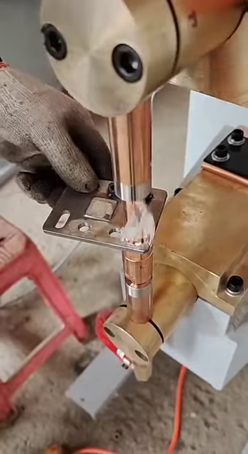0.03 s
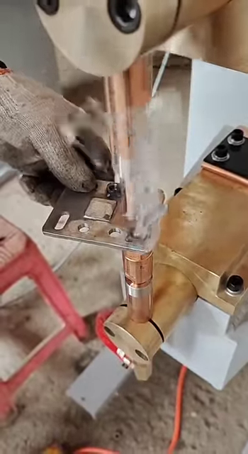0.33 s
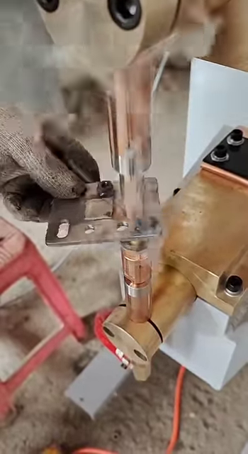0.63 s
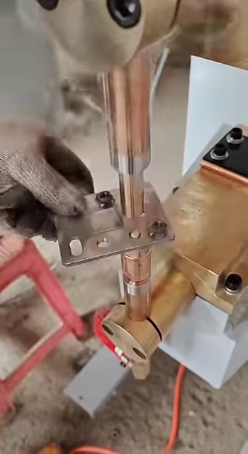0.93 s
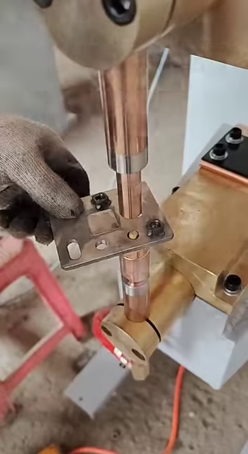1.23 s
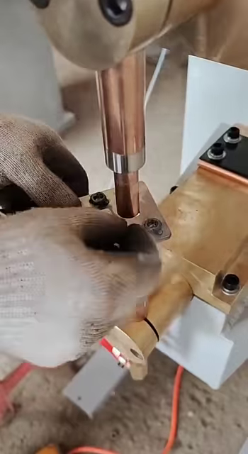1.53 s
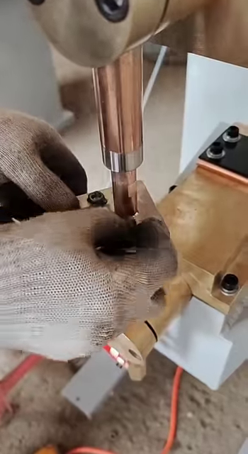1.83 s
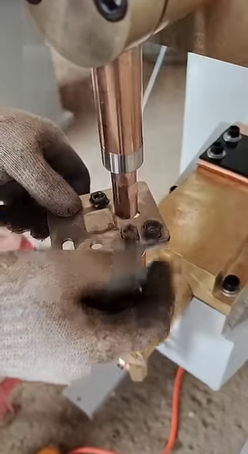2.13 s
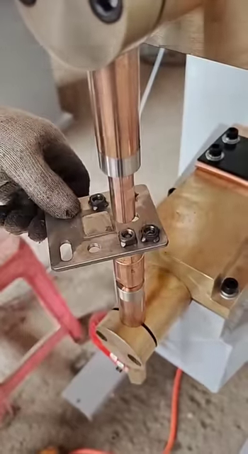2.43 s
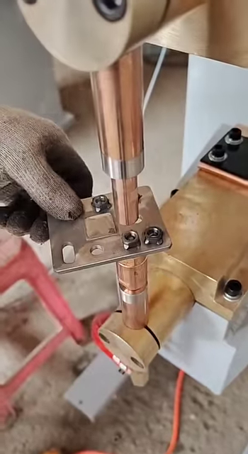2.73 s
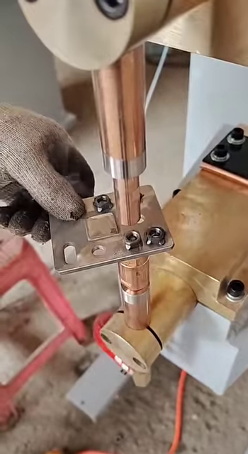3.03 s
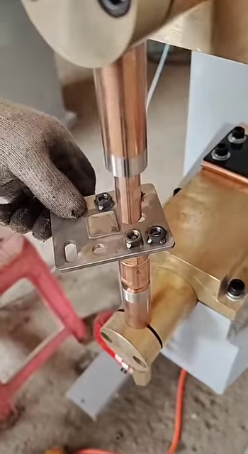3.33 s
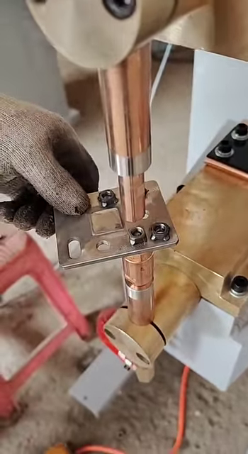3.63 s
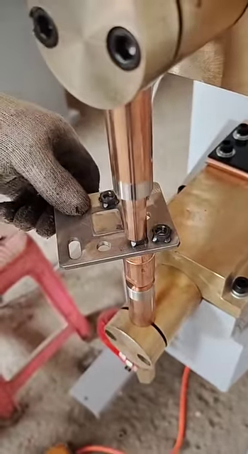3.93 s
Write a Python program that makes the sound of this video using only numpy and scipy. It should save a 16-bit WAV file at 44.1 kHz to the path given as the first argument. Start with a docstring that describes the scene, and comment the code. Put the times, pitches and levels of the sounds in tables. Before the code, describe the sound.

Close by in a workshop, a spot welder blasts air and thuds down twice. Between the two strokes come light metal ticks, soft glove rustling and a sharp pedal click, over a faint low drone.

```python
"""A workshop, close to a pneumatic resistance welder that fixes nuts to a steel plate.
Twice its valve dumps air in a bright hiss and the ram thuds down, booming through the frame.
In between, the plate ticks against the electrodes, a gloved hand sets the next nut with a rustle
of cloth, and the pedal clicks. Hiss, ticks and clicks echo over a low drone."""
import sys
import numpy as np
from scipy import signal
from scipy.fft import rfft, irfft
from scipy.io import wavfile
from scipy.ndimage import uniform_filter1d

SR = 44100
rng = np.random.default_rng(int(sys.argv[2]) if len(sys.argv) > 2 else 0)


def unload_audio(sound):
    """Save the sound as a 16-bit wav file, at the path given as the first command line argument."""
    columns = np.transpose(np.atleast_2d(sound))
    # keep every value between -1 and 1, then stretch to whole-number steps
    steps = np.round(np.clip(columns, -1, 1) * 32767)
    wavfile.write(sys.argv[1], SR, steps.astype(np.int16))


N = 176400
T = np.arange(2 * SR) / SR  # clock for one event, in seconds


# Colour of the rushing air (frequency [Hz], level [dB])
HISS_COLOUR = [(60, -40.5), (100, -15.5), (170, -17.5), (300, -28), (600, -25.5), (1000, -14.5),
               (1400, -12.5), (1800, -10.5), (2300, -3.5), (2800, -1.5), (3600, -4.5), (5000, -4.5),
               (6100, 0), (7200, -6.5), (8200, -15.5), (9400, -8), (10600, -17), (11700, -12)]
# Narrow muffler resonances (frequency [Hz], boost [dB])
MUFFLER_PEAKS = [(1987, 3.5), (2450, 7), (2663, 6), (2772, 0), (2875, 6), (3107, 7), (3331, 4.5), (3930, 3),
                 (4096, 9.5), (6115, 3)]

def muffler_hiss(half_width_hz=15):
    """Turbulent air, coloured by the muffler's resonances."""
    hz = np.fft.rfftfreq(len(T), 1 / SR)
    boost_db = sum(db / (1 + ((hz - f) / half_width_hz) ** 2) for f, db in MUFFLER_PEAKS)
    return unit(irfft(rfft(noise(HISS_COLOUR, len(T))) * amp(boost_db)))


# Exhaust blasts (time [s], hold [s], level [dB])
BLASTS = [(-.1, 0.081, -21.5), (3.381, 0.15, -17.5)]
# Tail of a blast (frequency [Hz], T60 [s])
BLAST_DECAY = [(300, 1.2), (1200, 1.71), (2800, 1.233), (5500, 0.99), (7500, 0.65), (11000, 0.63)]
# Spits of air as the valve opens (time [s], level [dB], attack [s], T60 [s])
PUFFS = [(3.298, -50, .003, 0.59), (3.331, -43.5, 0.023, .1), (3.353, -25.5, 0.0047, 0.22)]
# Their sharp colour (frequency [Hz], level [dB])
PUFF_COLOUR = [(180, -56), (300, -27.5), (2200, -4.5), (2770, 1), (3550, -9), (4140, 2), (5130, -12),
               (5990, -4.5), (12000, -15.5), (15600, -47), (22000, -120)]
# Ring of the valve body (frequency [Hz], relative level [dB], T60 [s])
VALVE_MODES = [(134, -9, 0.13), (205.5, 2.5, 0.082), (325, -10.5, 0.12), (1985, 3, .15)]

def air_valve(attack_s=.0075, sag_db_per_s=12, kick_s=3.379, kick_db=-27):
    """The valve puffs and kicks open; the exhaust holds, then dulls as the cylinder empties."""
    out = np.zeros(N)
    for s, hold, db in BLASTS:
        pressure = np.minimum(T / attack_s, 1) * amp(db - sag_db_per_s * np.minimum(T, hold))
        add(out, s, pressure * fade(muffler_hiss(), BLAST_DECAY, hold))
    for s, db, attack, t60 in PUFFS:
        add(out, s, amp(db) * burst(PUFF_COLOUR, attack, t60))
    add(out, kick_s, sum(amp(kick_db + db) * mode(hz, .0035, t60) for hz, db, t60 in VALVE_MODES))
    return out


# Ram hits (time [s], boom level [dB], hardness: gain on the upper modes [dB], rattle level [dB])
RAM_HITS = [(.041, -11.5, -19.5, -22.5), (3.538, -18.5, 2, -19)]
# Boom of the frame (frequency [Hz], relative level [dB], T60 [s])
FRAME_MODES = [(82.3, -20, 1.2), (97.8, -13.5, 0.81), (112.5, -18, 2.25), (137.4, -1, .55),
               (158.3, -14, 0.54), (183, -11.5, 1.1), (222, -3, 0.44), (237, -15.5, 2.8), (269, -22.5, 0.6),
               (326, -3.5, .35), (335, -18, 1.3), (392, -15, .7), (455.5, -19.5, .5), (555, -13, 0.34),
               (697, -16, 0.47), (964, -5, .28), (1015, -19, 1.0), (1188, -22.5, 0.35)]
# Colour of the dense panel rattle (frequency [Hz], level [dB])
RATTLE_COLOUR = [(25, -32.5), (50, -24.5), (90, -5), (160, 0), (260, -2.5), (450, -13), (900, -13.5),
                 (1500, -17.5), (4000, -21.5)]
# Its tail (frequency [Hz], T60 [s])
RATTLE_DECAY = [(50, 1.5), (120, 1.52), (250, 1.74), (500, 0.78), (900, 0.37), (3000, 0.21)]

def ram(boom_attack_cycles=2.9, hardness_ramp_hz=(140, 410), rattle_attack_s=.008):
    """The electrode lands: the frame booms and its panels rattle."""
    out = np.zeros(N)
    for s, boom_db, hardness_db, rattle_db in RAM_HITS:
        for hz, db, t60 in FRAME_MODES:
            gain = amp(boom_db + db + hardness_db * np.interp(hz, hardness_ramp_hz, [0, 1]))
            add(out, s, gain * mode(hz, boom_attack_cycles / hz, t60, len(T)))
        rattle = fade(noise(RATTLE_COLOUR, len(T)), RATTLE_DECAY)
        add(out, s, amp(rattle_db) * np.minimum(T / rattle_attack_s, 1) * rattle)
    return out


# Plate and nut ticks (time [s], crack level [dB], crack tilt [dB/octave], attack [s],
# ring level of each of the mode groups 0-3 [dB])
TICKS = [(0.332, -32, -5, .001, -43, -23, -39, -42), (0.4991, -37.5, 1, 0.0009, -64, -33, -40, -57),
         (.527, -42.5, 1, 0.0041, -60, -39, -38.5, -58), (0.6306, -39, -2, 0.0018, -41.5, -30, -38, -48),
         (0.684, -31, -3, 0.0038, -23, -36, -27, -42), (1.0772, -41, 5.5, 0.00075, -68, -54, -52, -58),
         (1.423, -57.5, 0, .002, -52.5, -60, -71, -66), (1.6585, -44, 3, .002, -54, -45, -46, -40),
         (1.776, -52, 1.5, .003, -56, -57, -48, -53), (1.83, -59, -1, 0.0017, -63, -56, -54.5, -70),
         (3.14, -58, -7, .003, -76, -70, -68, -76), (3.224, -45.5, 5, 0.0041, -52, -58, -49, -62)]
# Ring of the plate (frequency [Hz], relative level [dB], T60 [s], group [rounded to 0-3])
PLATE_MODES = [(2890, -0.5, .07, -0.5), (3774, -15.5, 0.047, 0), (4910, -4, 0.044, 1),
               (5315, -4, 0.059, 0.5), (6400, -6.5, 0.045, 2), (7570, -1, .075, 2), (10190, -4, .08, 3)]
# Bright transient of a tick (frequency [Hz], level [dB])
CRACK_COLOUR = [(500, -11), (1200, -3.5), (3000, 2.5), (5200, 3.5), (7500, 4), (8500, -10.5), (10000, -2),
                (12000, -10)]
# The work knocks on the lower electrode (time [s], level [dB], T60 [s])
KNOCKS = [(.338, -45, 0.19), (.53, -45, 0.45), (.57, -52, 0.39), (.688, -42.5, 0.28), (1.668, -63, .25),
          (1.782, -58, 0.46), (2.757, -73, .25), (3.112, -52.5, 0.068), (3.226, -52, 0.16)]
# Dull body of a knock (frequency [Hz], level [dB])
KNOCK_COLOUR = [(300, -27), (700, -7), (870, -4.5), (1020, 3), (1200, -6), (1600, -17), (4000, -31.5)]

def plate(seated_s=1.3, seated_tuning=1.012):
    """Steel contacts crack, ring and knock; seated on the guide pin, the plate rings a touch higher."""
    out = np.zeros(N)
    for s, crack_db, tilt_db, attack, *ring_db in TICKS:
        tuning = seated_tuning if s > seated_s else 1
        ring = sum(amp(db + ring_db[round(group)]) * mode(hz * tuning, attack, t60)
                   for hz, db, t60, group in PLATE_MODES)
        add(out, s, chatter(ring))
        add(out, s, amp(crack_db) * burst(CRACK_COLOUR, attack, t60=.07, tilt_db=tilt_db))
    for s, db, t60 in KNOCKS:
        add(out, s, amp(db) * burst(KNOCK_COLOUR, attack=.004, t60=t60))
    return out


def chatter(ring, depth=.33):
    """A loose contact rattles while it rings, roughening the tone."""
    shake = unit(uniform_filter1d(rng.standard_normal(len(ring)), size=90))
    return ring * (1 + depth * shake) / np.hypot(1, depth)


# Pedal click and bounce (time [s], ring level [dB], snap level [dB], tuning [ratio])
CLICKS = [(3.277, -21, -29, 1.0), (3.2871, -25.5, -30.5, 1.04)]
# Ring of the switch (frequency [Hz], relative level [dB], T60 [s])
SWITCH_MODES = [(1208, -3, 0.032), (1350, -6.5, 0.037), (1730, -6.5, 0.057), (3210, -17, 0.097),
                (4670, -13, 0.038), (5100, -7, 0.041), (5450, -11.5, 0.048), (9820, -15.5, 0.03)]
# Colour of its scrape and snap (frequency [Hz], level [dB])
SNAP_COLOUR = [(150, -10), (350, -2), (700, -13), (1200, 4), (2500, 1), (5800, -2), (8000, -13),
               (12000, -9)]

def pedal(scrape_s=.023, scrape_db=-45):
    """The lever scrapes through its slack, then the switch snaps over and bounces."""
    out = np.zeros(N)
    add(out, CLICKS[0][0] - scrape_s, amp(scrape_db) * burst(SNAP_COLOUR, attack=scrape_s, t60=.05))
    for s, ring_db, snap_db, tuning in CLICKS:
        ring = sum(amp(db) * mode(hz * tuning, .00095, t60) for hz, db, t60 in SWITCH_MODES)
        snap = burst(SNAP_COLOUR, attack=.0012, t60=.06)
        add(out, s, amp(ring_db) * ring + amp(snap_db) * snap)
    return out


# Cloth moves (peak time [s], attack [s], release [s], body level [dB], sheen level [dB])
SWISHES = [(1.08, 0.12, 0.12, -54.5, -72.5), (1.22, 0.052, 0.075, -55.5, -59),
           (1.34, 0.052, 0.12, -75.5, -63.5), (1.78, 0.079, 0.081, -68.5, -70.5),
           (2.06, 0.048, 0.077, -62.5, -91), (2.22, .05, 0.12, -68, -62.5), (2.42, 0.097, 0.063, -50, -83),
           (3.12, 0.054, 0.22, -62, -62.5)]
# Soft body of the cloth (frequency [Hz], level [dB])
CLOTH_COLOUR = [(300, -2.5), (500, -2), (750, -2), (1150, 1.5), (1550, 0), (1950, -5.5), (2700, -5),
                (6500, -8.5), (8500, -21.5), (12000, -16)]
# Its silky top (frequency [Hz], level [dB])
SHEEN_COLOUR = [(1500, -25), (3000, -4), (4000, 3), (5000, -6.5), (7000, -10.5), (9000, -38)]

def cloth(grain_db=2):
    """Glove and sleeve swish in soft, grainy swells as the hand comes and goes."""
    t = np.arange(N) / SR
    body_power = sheen_power = 0
    for s, attack, release, body_db, sheen_db in SWISHES:
        from_peak = (t - s) / np.where(t < s, attack, release)
        swell = 1 / np.cosh(np.clip(1.163 * from_peak, -20, 20))
        body_power += (amp(body_db) * swell) ** 2
        sheen_power += (amp(sheen_db) * swell) ** 2
    grain = amp(grain_db * unit(uniform_filter1d(rng.standard_normal(N), size=200)))
    body = np.sqrt(body_power) * unit(patchy(noise(CLOTH_COLOUR, N), depth_db=2.5))
    sheen = np.sqrt(sheen_power) * noise(SHEEN_COLOUR, N)
    return unit(grain) * (body + sheen)


# Short rubs (time [s], level [dB], attack [s], T60 [s], pitch [Hz])
DRAGS = [(2.06, -73, .02, .15, 600), (2.29, -61, 0.017, .2, 1300), (2.37, -56, .04, .3, 760),
         (2.43, -58, .012, .12, 1090), (2.47, -61.5, 0.035, 0.7, 576), (3.113, -56, .002, .06, 1620)]

def glove_drags(half_width_ratio=.087):
    """The glove drags on the steel; each rub sounds one broad resonance."""
    out = np.zeros(N)
    hz = np.fft.rfftfreq(SR, 1 / SR)
    for s, db, attack, t60, pitch in DRAGS:
        rub = irfft(rfft(rng.standard_normal(SR)) / (1 + ((hz / pitch - 1) / half_width_ratio) ** 2))
        add(out, s, amp(db) * unit(rub) * envelope(attack, t60, SR))
    return out


# Soft thumps on the machine (time [s], level [dB], attack [s], T60 [s])
BUMPS = [(1.03, -53, 0.037, 1), (1.199, -54, 0.028, 1), (1.55, -55.5, 0.044, 0.35),
         (1.759, -62, 0.021, 0.36), (2.02, -56, 0.044, 1), (2.221, -61, .05, .7), (2.441, -57.5, 0.045, .5),
         (2.952, -63, 0.0096, 0.14)]
# Their muffled low end (frequency [Hz], level [dB])
BUMP_COLOUR = [(80, -10), (125, 1), (180, -6.5), (230, 0.5), (330, -9.5), (450, -22.5), (570, -19),
               (700, -38), (2000, -58)]

def hand_bumps():
    """Hands lean on the plate and stir the frame."""
    out = np.zeros(N)
    for s, db, attack, t60 in BUMPS:
        add(out, s, amp(db) * burst(BUMP_COLOUR, attack, t60))
    return out


# Bands of the workshop drone (frequency [Hz], level [dB])
DRONE_BANDS = [(118, -75), (137, -71), (230, -66), (333, -73.5)]
# Colour of the noise bed (frequency [Hz], level [dB])
BED_COLOUR = [(15, -57), (25, -37), (43, -7), (138, -2), (349, -3.5), (386, -7), (500, -24), (737, -16.5),
              (906, -27.5), (1010, -13.5), (1370, -30), (1520, -20.5), (12000, -33.5), (15600, -75.5),
              (22000, -120)]

def room_tone(half_width_hz=12.7, bed_db=-65):
    """Narrow bands of noise make a wavering drone over a quiet bed."""
    hz = np.fft.rfftfreq(N, 1 / SR)
    drone = np.zeros(N)
    for centre, db in DRONE_BANDS:
        band = irfft(rfft(rng.standard_normal(N)) / (1 + ((hz - centre) / half_width_hz) ** 2), N)
        drone += amp(db) * unit(band)
    return drone + amp(bed_db) * noise(BED_COLOUR, N)


# Reverb time of the workshop (frequency [Hz], T60 [s])
REVERB_DECAY = [(100, 3.2), (1000, 2.46), (3000, 1.26), (7000, 0.72), (11000, 0.57)]

def reverb(send, attack_s=.0071):
    """The workshop's diffuse echo, darkening as it dies."""
    tail = fade(rng.standard_normal(len(T)), REVERB_DECAY) * np.minimum(T / attack_s, 1)
    return signal.fftconvolve(send, tail / np.linalg.norm(tail))[:N]


def amp(db):
    """Decibels to gain."""
    return 10 ** (np.asarray(db) / 20)


def unit(x):
    """Scales to rms 1."""
    return x / np.sqrt(np.mean(x ** 2) + 1e-20)


def curve_at(points, hz):
    """Reads a curve over log frequency."""
    f, value = np.transpose(points)
    return np.interp(np.log(hz + 1), np.log(f + 1), value)


def add(mix, s, sound):
    """Mixes a sound in at s seconds, trimming any overhang."""
    at = round(s * SR)
    sound = sound[max(-at, 0):]
    part = mix[max(at, 0):][:len(sound)]
    part += sound[:len(part)]


def noise(colour, size, tilt_db=0):
    """Coloured noise of rms 1, tilted by tilt_db per octave and rolled off below its lowest point."""
    hz = np.fft.rfftfreq(size, 1 / SR) + 1
    gain = amp(curve_at(colour, hz) + tilt_db * np.log2(hz / 5000))
    gain /= (1 + (colour[0][0] / 2 / hz) ** 2) ** 2
    return unit(irfft(rfft(rng.standard_normal(size)) * gain, size))


def fade(x, decay, hold=0):
    """After the hold, each frequency dies at its own speed."""
    hz, t, spectrum = signal.stft(x, SR, nperseg=512)
    gain = np.exp(-np.log(1000) * np.maximum(t - hold, 0) / curve_at(decay, hz)[:, None])
    return signal.istft(spectrum * gain, SR)[1][:len(x)]


def patchy(x, depth_db):
    """Brief random patches of the spectrum stand out."""
    spectrum = signal.stft(x, SR, nperseg=512)[2]
    bands = uniform_filter1d(rng.standard_normal(spectrum.shape), size=3, axis=0)
    patches = unit(uniform_filter1d(bands, size=7, axis=1))
    return signal.istft(spectrum * amp(depth_db * patches), SR)[1][:len(x)]


def envelope(attack, t60, size):
    """Linear attack, then a fall of 60 dB every t60 seconds."""
    t = T[:size]
    return np.minimum(t / max(attack, 1e-4), 1) * np.exp(-np.log(1000) * np.maximum(t - attack, 0) / t60)


def burst(colour, attack, t60, tilt_db=0):
    """A short puff of coloured noise."""
    return noise(colour, SR // 2, tilt_db) * envelope(attack, t60, SR // 2)


def mode(hz, attack, t60, size=SR // 2):
    """One ringing partial."""
    return np.sin(2 * np.pi * (hz * T[:size] + rng.random())) * envelope(attack, t60, size)


def scene(air_send_db=-11.5, plate_send_db=-10, pedal_send_db=-12.5):
    """Mono mix of machine, handling and room tone; air, plate and pedal feed the reverb."""
    air, ticks, clicks = air_valve(), plate(), pedal()
    echo = reverb(amp(air_send_db) * air + amp(plate_send_db) * ticks + amp(pedal_send_db) * clicks)
    machine = air + ram() + ticks + clicks
    handling = cloth() + glove_drags() + hand_bumps()
    return (machine + handling + echo + room_tone())[None]


def record(dry):
    """A steep high cut takes off the very top."""
    high_cut = signal.firwin(511, cutoff=12150, window=("kaiser", 9), fs=SR)
    return signal.oaconvolve(dry, high_cut[None], "same")


dry = scene()
out = record(dry)
unload_audio(out)
```